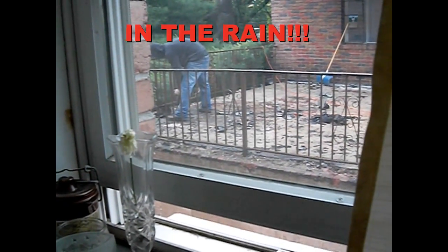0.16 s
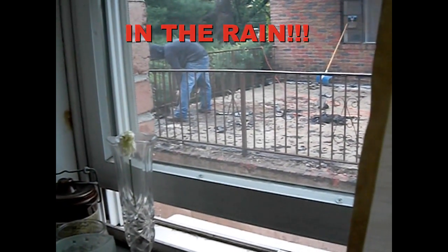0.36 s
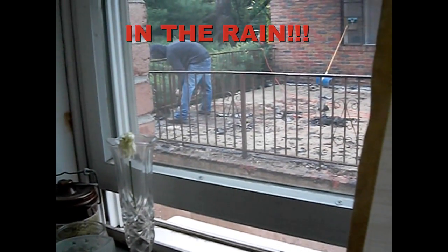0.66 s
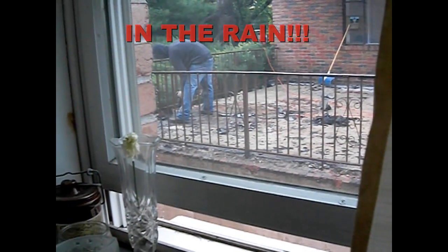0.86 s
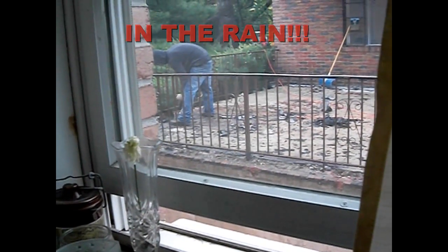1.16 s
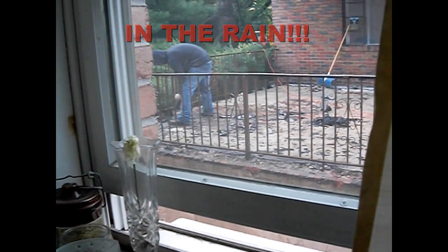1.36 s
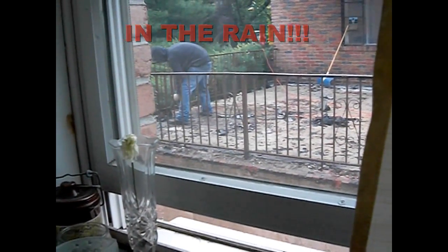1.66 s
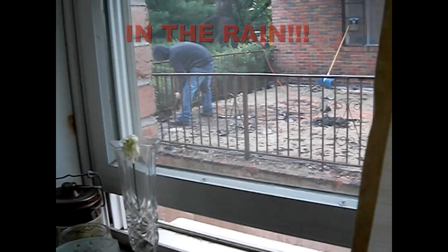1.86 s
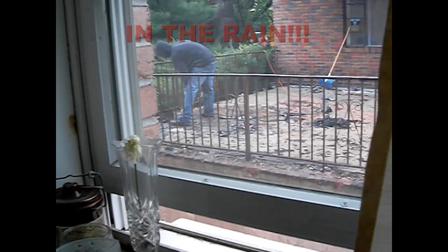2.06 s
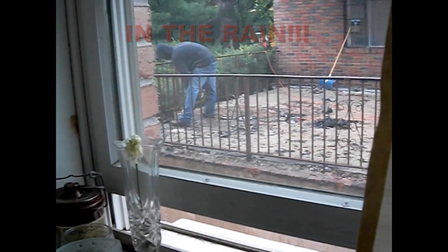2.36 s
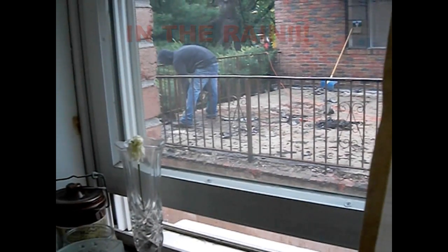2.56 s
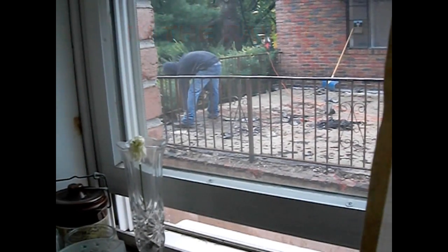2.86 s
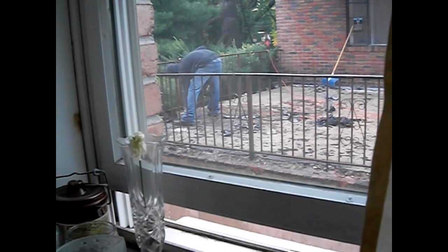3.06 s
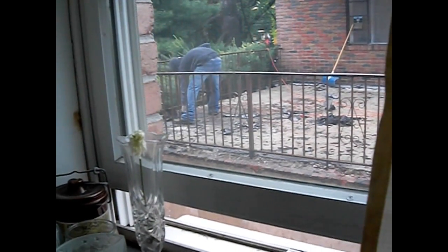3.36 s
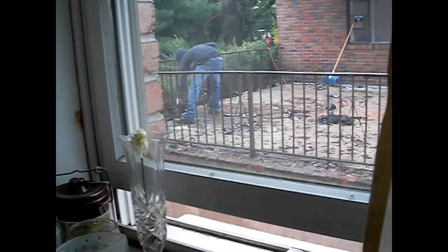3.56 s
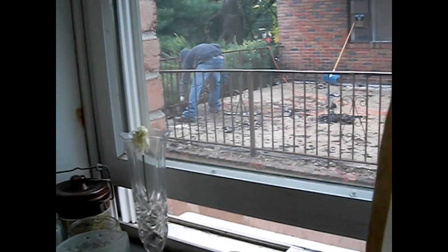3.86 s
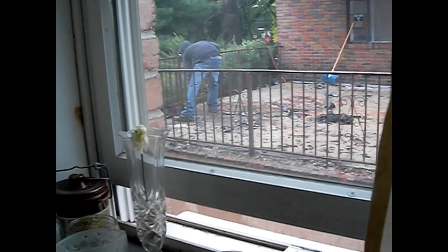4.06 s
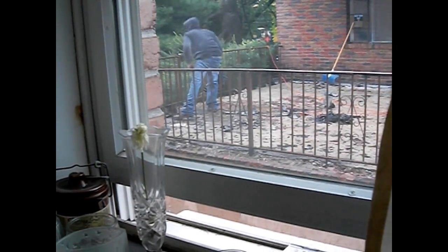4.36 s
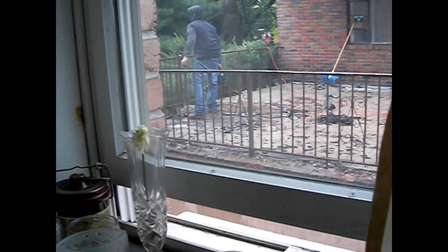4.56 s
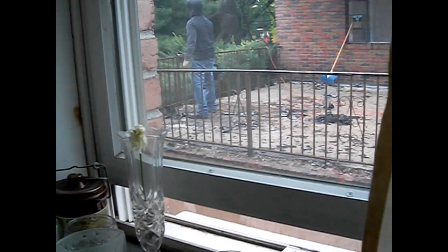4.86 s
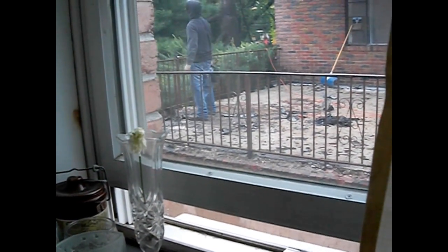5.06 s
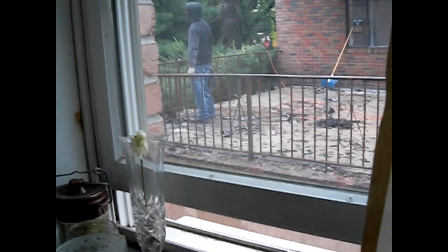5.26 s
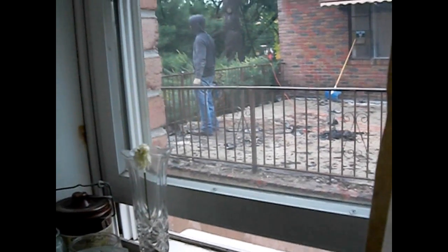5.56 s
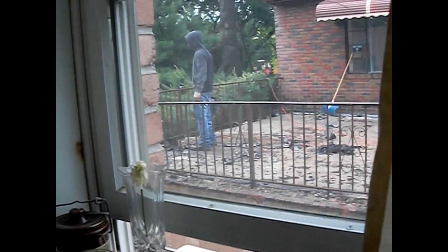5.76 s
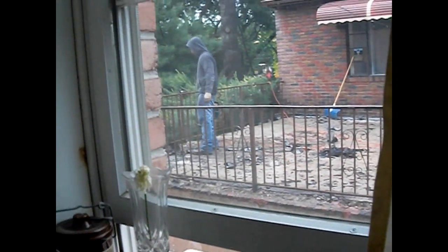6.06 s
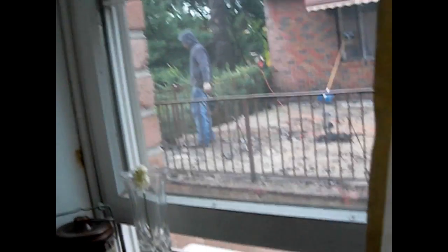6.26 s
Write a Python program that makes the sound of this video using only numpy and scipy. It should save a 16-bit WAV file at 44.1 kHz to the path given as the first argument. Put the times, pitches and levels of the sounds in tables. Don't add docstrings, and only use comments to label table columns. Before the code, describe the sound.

From inside a kitchen by an open window, an electric breaker is already pounding a tiled terrace at 0 s: a dense, hard rattle of about thirty blows a second, growing slightly stronger until 0.66 s, with clattering stones, gritty hiss, metallic whine and low structural rumble. A short gap of rain follows. The second burst runs from 1.0 to 1.6 s, spinning up quickly and dulling as the tile cracks, then the chisel bounces out unevenly until 1.83 s with tiny squeals. Between 2.48 and 2.98 s come irregular single knocks, woody and stony, with loose debris and thin steel rings. Rain thickens slightly from 3 to 3.7 s. At 4.39 to 4.65 s dropped rubble lands in two quick clusters of clacks. Rain and faint fridge hum continue; two tiny drips tick at 5.87 and 5.94 s. It cuts off at about 6.38 s. Short yard echoes, coarse lo-fi tone.

```python
import sys
import numpy as np
from scipy import signal
from scipy.fft import rfft, irfft
from scipy.io import wavfile
from scipy.ndimage import uniform_filter1d

SR = 44100
rng = np.random.default_rng(int(sys.argv[2]) if len(sys.argv) > 2 else 0)


def voltage_ratio(level):
    return 10 ** (np.asarray(level, float) / 20)


def wav_out(sig):
    wavfile.write(sys.argv[1], SR, np.round(np.clip(np.atleast_2d(sig).T, -1, 1) * 32767).astype(np.int16))


N = 282240

# pitch_hz, density_db (per Hz)
RAIN_SPECTRUM = [(12, -37), (20, -10), (71, -6.5), (128, -3.5), (396, -5.5), (455, -7.5), (859, -7.5),
                 (1190, -10), (1870, -8.5), (2530, -11.5), (3960, -10), (4780, -6), (5500, -8.5),
                 (7150, -42), (12100, -120)]
# pitch_hz, width_hz, level_db
WINDOW_FRAME = [(869, 45, -69.5), (1672, 36, -64), (1874, 64, -58), (2883, 110, -62), (4395, 140, -60.5),
                (4680, 62, -56)]
# start_s, peak_db, pitch_hz (the sill sounds at 0.85 of it)
DRIPS = [
    (5.8673, -30.5, 4700),
    (5.9361, -28, 4680),
]
# pitch_hz, width_hz, level_db
FRIDGE_HUM = [(30.5, 6.4, -60.5), (124.75, 2.4, -55.5), (194.3, 31, -59.5), (280.5, 21, -59.5),
              (408.4, 17.5, -61.5)]
# pitch_hz, width_hz, level_db
FOUNDATION = [(68.4, 5.9, -15), (89, 13, 0.5), (126.1, 12.6, 1.5), (182.4, 8.9, -2), (213, 12, -4)]
# pitch_hz, t60_s
YARD_DECAY = [(200, 0.4), (700, 0.36), (2000, 0.32), (5000, 0.19)]
# delay_s, level_db
ECHOES = [
    (.0045, -5),
    (.0125, -11),
    (.0255, -12),
]

# pitch_hz, density_db (per Hz)
CLATTER_SPECTRUM = [(130, -17), (220, -20), (343, -5), (392, -30), (513, -1.5), (651, 4), (768, -4.5),
                    (834, -5), (1160, -10), (1260, -20), (1700, -10.5), (2030, -95), (2600, -17),
                    (3380, -17), (5720, -120)]
# pitch_hz, density_db (per Hz)
SPILL_SPECTRUM = [(130, -50), (220, -39), (282, 1), (422, -4), (524, 2), (658, 4), (752, 5), (925, 2.5),
                  (1220, -8), (1720, -25.5), (2600, -10), (3380, -40), (5720, -120)]
# pitch_hz, density_db (per Hz)
GRIT_SPECTRUM = [(1350, -4.5), (2300, -2), (2580, -1.5), (2820, -8.5), (3060, -12), (3320, -2.5),
                 (4060, -1), (4620, 1.5), (4820, 4), (5500, 0.5), (7150, -41), (12100, -120)]
# peak_s, level_db, rise_db_per_s, fall_db_per_s
SQUEALS = [
    (1.4, -38, 53, 71),
    (1.68, -42, 66, 254),
    (1.808, -37, 400, 280),
    (2.78, -32.5, 139, 450),
    (2.875, -34.5, 403, 140),
]
# start_s, pitch_hz, level_db, t60_s
SHANK_TONES = [
    (2.482, 3830, -35.5, 0.22),
    (2.543, 3790, -35, 0.19),
    (2.915, 3760, -34.5, 0.13),
    (4.592, 3700, -35, 0.1),
]

# pitch_hz, level_db, t60_s
LOW_SLAB_MODES = [(305, -6, .025), (398, 0, .03), (478, -3, .025)]
SLAB_MODES = [(600, 0, .045), (665, 0, .048), (825, -4, .035), (950, -11, .02)]
TILE_MODES = [(1274, 3, 0.032), (1226, -0.5, 0.033), (1424, 4, 0.064), (1475, 1, 0.034), (1641, 8.5, 0.034),
              (1815, -4, 0.069), (2190, -7.5, 0.025)]
STEEL_MODES = [(2500, -3, .008), (2890, 0, .018), (3300, -3, .008), (3800, -3, .01), (4300, -5, .008),
               (4900, -4, .012)]
GROUND_MODES = [(65, 2, 0.15), (93, 13.5, 0.35), (138.7, 14, 0.26), (204, -18, 0.02)]
# pitch_hz, level_db, t60_s
THUD_MODES = [(310, -18, 0.0099), (383.4, 1.5, 0.026), (421, -3.5, 0.016)]
STONE_MODES = [(630, 4, 0.06), (840, 2, 0.058), (905, -2, 0.037)]
CHIP_MODES = [(1126, 1, 0.024), (1310, -0.5, 0.026), (1533, -1.5, 0.03), (1834, -2, 0.029),
              (2044, -11, 0.016)]

# start_s, peak_db, thud_db, chip_db, steel_db
DROPS = [(4.385, -21.5, 1.5, -0.5, -12), (4.403, -24.5, -7, 1, -4), (4.415, -23.5, 0, 6, -18),
         (4.434, -27, -6, 3.5, -5), (4.464, -36, -10, -5, -8), (4.542, -19.5, -1.5, -3.5, -14),
         (4.556, -25.5, -12, -6, -9), (4.57, -23.5, 0, 6, -6.5), (4.591, -24, -1.5, 6, -3.5),
         (4.636, -28.5, -4, 0, -4), (4.654, -29.5, -5, -4, -3)]
# start_s, peak_db, thud_db, chip_db, steel_db
KNOCKS = [(2.48, -26.5, -2, 3.5, -1.5), (2.541, -20.5, 2, 3.5, -7.5), (2.562, -30, 4, -12, -21),
          (2.592, -28, -15, -10, -27), (2.636, -22.5, 2, 3, -6), (2.668, -25.5, 3.5, 6, -4.5),
          (2.7, -22, -0.5, 1, -5), (2.732, -18, -1.5, -2, -12), (2.854, -19, 2, 1, -6.5),
          (2.884, -22, 6, -1.5, -4.5), (2.904, -23, -2, -9, -22), (2.929, -29.5, -10, -9, -22),
          (2.975, -30, -19, -15, -18)]
# start_s, peak_db, tile_db, steel_db
RUNOUT = [
    (.675, -48, -2, 0),
    (1.599, -25, -11, -13),
    (1.63, -25.5, -3, -13),
    (1.669, -44, 11, 10),
    (1.704, -39, 5, 3.5),
    (1.734, -33.5, -0.5, -10),
    (1.771, -30, -7, -18),
    (1.799, -32.5, -3, -3),
    (1.827, -46, -13, -6),
]
# time_s, slab_blow_db, lean_db
POUNDING = [
    [(0, -22.5, -5.5), (.04, -23, -6.5), (.18, -22.5, -2), (.24, -21, -0.5), (.42, -19.5, -1.5),
     (.57, -17.5, -2), (.66, -44, -2), (.72, -38, -10), (.82, -64, -17.5)],
    [(.99, -33.5, -10), (1.04, -28, -7.5), (1.25, -20.5, -1.5), (1.32, -27, -2), (1.44, -22.5, -2),
     (1.53, -29.5, -4.5), (1.62, -24, -5), (1.72, -40, -17), (1.88, -40, -33)],
]
# first_blow_s, start_rate_per_s, spin_up_s, bite_s, last_blow_s
BURSTS = [
    (.0062, 29.75, .006, .1225, .66),
    (.9959, 31.57, 1.1009, 1.1392, 1.58),
]


def evened(x):
    return x / np.sqrt(np.mean(x ** 2) + 1e-20)


def read(points, hz):
    f, value = np.transpose(points)
    return np.interp(np.log(hz + 1), np.log(f + 1), value)


def add(mix, s, sound):
    part = mix[round(s * SR):][:len(sound)]
    part += sound[:len(part)]


def coloured(x, spectrum):
    return evened(irfft(rfft(x) * voltage_ratio(read(spectrum, np.fft.rfftfreq(N, 1 / SR))), N))


def whistle(hz, width, steady):
    pole = np.exp((2j * np.pi * hz - np.pi * width) / SR)
    once = signal.lfilter([1], [1, -pole], rng.standard_normal(N))
    twice = signal.lfilter([1], [1, -pole], once)
    return evened((twice / (abs(twice) + 1e-9) ** np.clip(steady, 0, 1)).real)


def swell():
    span = int(0.4 * SR)
    drift = uniform_filter1d(uniform_filter1d(rng.standard_normal(N), span), span)
    return voltage_ratio(1.5 * evened(drift))


def rain():
    frames = N // 256 + 5
    a, b, patches = rng.standard_normal((frames, 513, 3)).T
    patches = evened(uniform_filter1d(uniform_filter1d(patches, 10, 0), 12, 1))
    wash = signal.istft((a + 1j * b) * voltage_ratio(1.2 * patches), nperseg=1024, noverlap=768)[1][:N]
    drops = rng.standard_normal(N) * voltage_ratio(2.8 * np.minimum(rng.exponential(1, N), 3))
    drops *= rng.random(N) < 1500 / SR
    falling = voltage_ratio(1.0) * coloured(evened(wash) + 0.46 * evened(drops), RAIN_SPECTRUM)
    frame = sum(voltage_ratio(db + 48.5) * swell() * whistle(hz, width, 0.055) for hz, width, db in WINDOW_FRAME)
    t, shower_s = np.arange(N) / SR, [3, 3.72]
    rain_db = np.interp(t, shower_s, [-47.5, -45])
    ring_db = np.interp(t, shower_s, [-6, 0])
    return voltage_ratio(rain_db) * (falling + frame * voltage_ratio(ring_db))


def drips():
    out, t = np.zeros(N), np.arange(9000) / SR
    for s, db, hz in DRIPS:
        add(out, s, voltage_ratio(db + 12 - 60 * t / .0012) * np.sin(2 * np.pi * .85 * hz * t))
    return out


def fridge():
    return sum(voltage_ratio(db) * whistle(hz, width, 1.0) for hz, width, db in FRIDGE_HUM)


def follow(db, base_db, slope):
    return base_db + slope * db


def turns(first, start_rate, spin_up, bite, last):
    free, loaded, sag_s = 33.28, 29.61, .1927
    t = np.arange(first, last + .3, 1 / SR)
    sag = loaded + (free - loaded) * np.exp(-(t - bite) / sag_s)
    rate = np.where(t < bite, np.interp(t, [spin_up, bite], [start_rate, free]), sag)
    return t, rate, np.cumsum(rate) / SR


def lean(t):
    return np.max([np.interp(t, *np.transpose(rows)[[0, 2]], -60, -60) for rows in POUNDING], axis=0)


def between_blows():
    out = np.zeros(N)
    for burst in BURSTS:
        add(out, burst[0], turns(*burst)[2] % 1)
    return out


def building():
    out = np.zeros(N)
    lag = 0.14
    for burst in BURSTS:
        t, rate, count = turns(*burst)
        level = voltage_ratio(follow(lean(t), -34.5, 1.39)) * signal.windows.tukey(len(t), .03)
        for k in range(2, 9):
            power = sum(voltage_ratio(2 * db) / (1 + (2 * (k * rate - hz) / width) ** 2) for hz, width, db in FOUNDATION)
            add(out, t[0], level * np.sqrt(power) * np.sin(2 * np.pi * k * (count - lag)))
    return out


def yard(x):
    taps = np.zeros(SR)
    at = np.arange(700, SR - 20, 20)
    taps[at + rng.integers(0, 20, len(at))] = rng.choice([-1., 1.], len(at))
    hz, t, z = signal.stft(taps, SR, nperseg=256)
    tail = signal.istft(z * voltage_ratio(-60 * t / read(YARD_DECAY, hz)[:, None]), SR, nperseg=256)[1]
    thin = signal.lfilter(*signal.butter(1, 1100, "high", fs=SR), x)
    return signal.fftconvolve(thin, tail / np.linalg.norm(tail))[:N]


def settling(kicks, start_db, db_per_s):
    power = np.zeros(N)
    fall = db_per_s * np.arange(SR // 2) / SR
    for s, db in kicks:
        add(power, s, voltage_ratio(2 * (db + start_db + fall)))
    return np.sqrt(power)


def rubble():
    load = lean(np.arange(N) / SR)
    singles = np.array([(s, db, steel) for s, db, *_, steel in KNOCKS + DROPS + RUNOUT[3:]])
    grains = rng.standard_normal((2, N)) * voltage_ratio(1.85 * np.minimum(rng.exponential(1, (2, N)), 3))
    grains *= rng.random((2, N)) < np.array([[1500], [3000]]) / SR
    clatter_db = -10.5 + follow(load, -17, 1.38) - 0.5 * between_blows()
    clatter = voltage_ratio(clatter_db) * coloured(grains[0], CLATTER_SPECTRUM)
    spill = settling(singles[:, :2], -14.5, -160) * coloured(grains[0], SPILL_SPECTRUM)
    scraped = zip(singles[:, 0], singles[:, 1] + singles[:, 2])
    grit = voltage_ratio(follow(load, -33, 1.15)) + settling(scraped, -8.5, -130)
    return clatter + spill + voltage_ratio(-1.5) * grit * coloured(grains[1], GRIT_SPECTRUM)


def whine():
    t = np.arange(N) / SR
    level = voltage_ratio(follow(lean(t), -51, 1.5))
    for s, db, rise, fall in SQUEALS:
        level = level + voltage_ratio(db - np.maximum(rise * (s - t), fall * (t - s)))
    return voltage_ratio(-2.5) * level * whistle(4880, 60, .4)


def shank():
    out, t = np.zeros(N), np.arange(9000) / SR
    for s, hz, db, t60 in SHANK_TONES:
        add(out, s, voltage_ratio(db - 60 * t / t60) * np.minimum(t / 0.00045, 1) * np.sin(2 * np.pi * hz * t))
    return out


def ring(modes, spread, scatter_db, rise):
    t = np.arange(6000) / SR
    chance = rng.standard_normal((len(modes), 3))
    x = np.zeros(len(t))
    for (hz, db, t60), (a, b, c) in zip(modes, chance):
        phase = 2 * np.pi * hz * (1 + spread * b) * t + 30 * spread * c
        x -= voltage_ratio(db + scatter_db * a - 60 * t / t60) * np.sin(phase)
    x *= 1 - np.exp(-t / rise)
    return x / abs(x).max()


def blows(rows, low_modes, slab, tile_modes, spread, chatter, trim_db, ground_db):
    out, low, t = np.zeros(N), np.zeros(N), np.arange(600) / SR
    for s, db, low_db, tile_db, steel_db in rows:
        body = ring(slab, spread, 150 * spread, 0.00017)
        body = body + voltage_ratio(low_db + 4.5) * ring(low_modes, .5 * spread, 70 * spread, 0.000055)
        tile = voltage_ratio(tile_db + 1.5) * ring(tile_modes, 1.5 * spread, 1.5, .0003)
        shell = tile + voltage_ratio(steel_db + 1.5) * ring(STEEL_MODES, 0.02, 4.8, 0.0005)
        drive = chatter * rng.standard_normal(len(t)) * np.exp(-t / 0.003) * (rng.random(len(t)) < .05)
        drive[0] = 1
        chattered = signal.fftconvolve(shell, drive / np.linalg.norm(drive))[:len(body)]
        add(out, s, voltage_ratio(db + trim_db) * (body + chattered))
        add(low, s, voltage_ratio(db + ground_db) * ring(GROUND_MODES, 0.062, 0.5, 0.0082))
    return signal.sosfilt(signal.butter(6, 265, "high", fs=SR, output="sos"), out) + low


def dropped_rubble():
    return blows(DROPS, THUD_MODES, STONE_MODES, CHIP_MODES, 0.0244, 0.42, -1.7, -26)


def single_blows():
    return blows(KNOCKS, THUD_MODES, STONE_MODES, CHIP_MODES, 0.016, 0.28, -0.93, -16)


def runout():
    rows = [(s, db, follow(steel, 0.5, 0.29), tile, steel) for s, db, tile, steel in RUNOUT]
    return blows(rows, LOW_SLAB_MODES, SLAB_MODES, TILE_MODES, 0.011, 0.44, -1.3, -8.5)


def pounding():
    rows = []
    for burst, force in zip(BURSTS, POUNDING):
        t, rate, count = turns(*burst)
        blow_count = int(np.interp(burst[4], t, count)) + 1
        s = np.interp(np.arange(blow_count), count, t)
        db = np.interp(s, *np.transpose(force)[:2])
        load = lean(s)
        wear_db = -11.5 * np.maximum(s - burst[3], 0)
        low_db = follow(load, -29, 1.86) - db
        tile_db = follow(load, -18.5, 1.65) + wear_db - db
        steel_db = follow(load, -36.5, 1.5) - db
        rows += zip(s, db, low_db, tile_db, steel_db)
    return blows(rows, LOW_SLAB_MODES, SLAB_MODES, TILE_MODES, .002, .2, 9, -45)


def scene():
    steady = pounding() + runout()
    singles = single_blows() + dropped_rubble()
    near = steady + singles + shank() + drips()
    for s, db in ECHOES:
        add(near, s, voltage_ratio(db) * (steady + voltage_ratio(-8) * singles))
    reverberant = voltage_ratio(-7) * yard(steady + voltage_ratio(2) * singles)
    background = building() + rubble() + whine() + rain() + fridge()
    return (near + reverberant + background)[None]


def top_cut(x):
    return signal.sosfilt(signal.butter(12, 16320, fs=SR, output="sos"), x)


def record(dry):
    hold = 4
    smooth = signal.oaconvolve(dry, signal.firwin(61, 5450, fs=SR)[None], "same")
    held = np.repeat(smooth[:, ::hold], hold, axis=1)[:, :N]
    level = np.sqrt(abs(uniform_filter1d(held ** 2, 1000)))
    held = held + (voltage_ratio(-62.0) + voltage_ratio(-22.0) * level) * rng.standard_normal(dry.shape)
    edge = signal.firwin(255, 15650, window=("kaiser", 8), fs=SR)
    held = signal.oaconvolve(held, edge[None], "same")
    stop_s = 6.377
    finished = held * np.where(np.arange(N) < stop_s * SR, 1, voltage_ratio(-26))
    return top_cut(finished)


dry = scene()
out = record(dry)
wav_out(out)
```